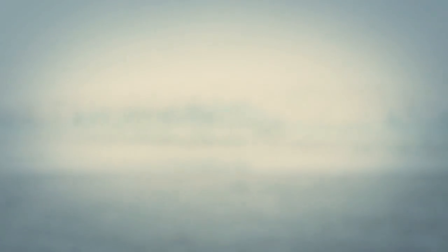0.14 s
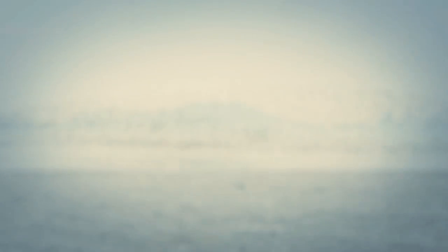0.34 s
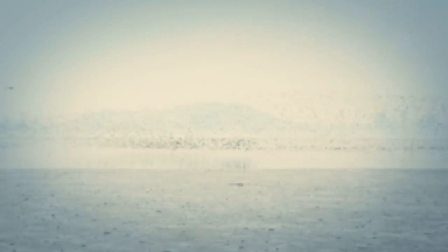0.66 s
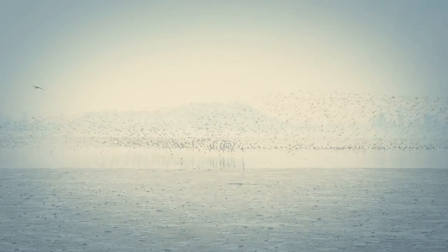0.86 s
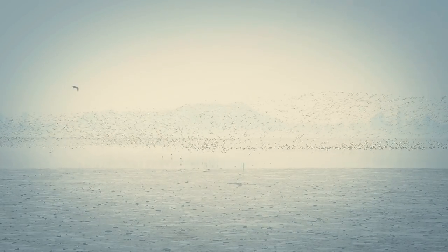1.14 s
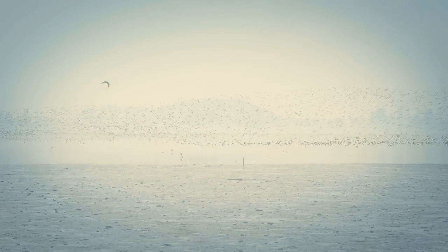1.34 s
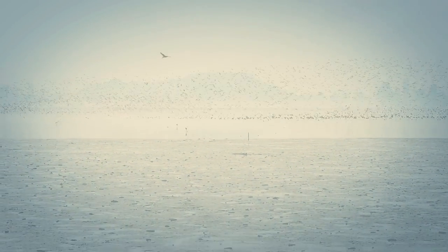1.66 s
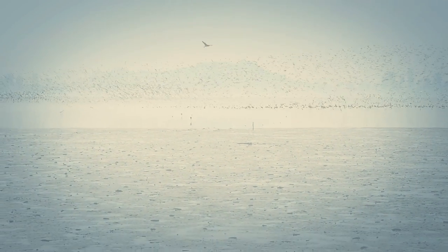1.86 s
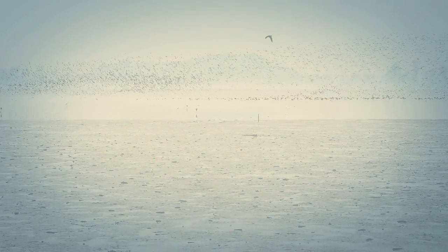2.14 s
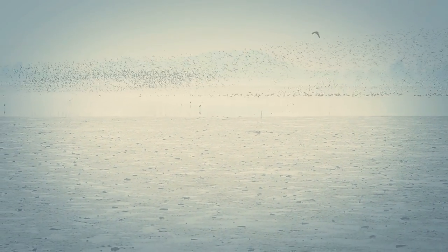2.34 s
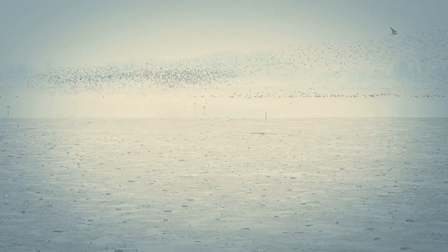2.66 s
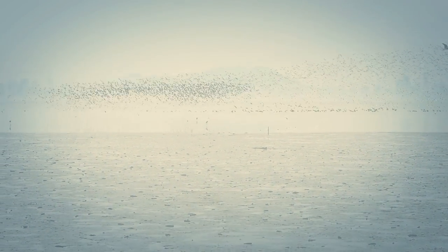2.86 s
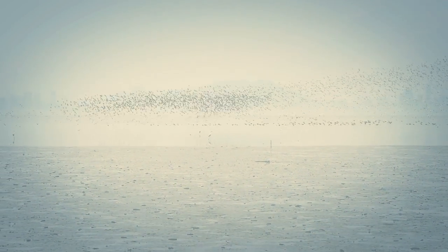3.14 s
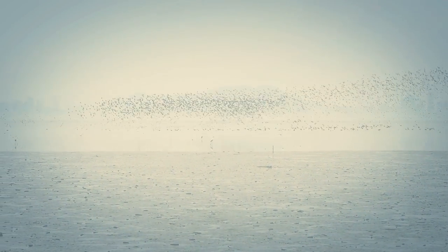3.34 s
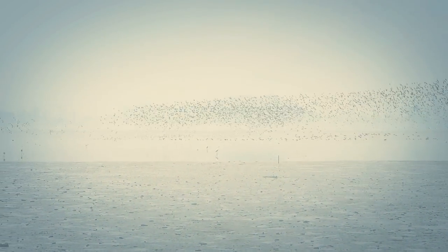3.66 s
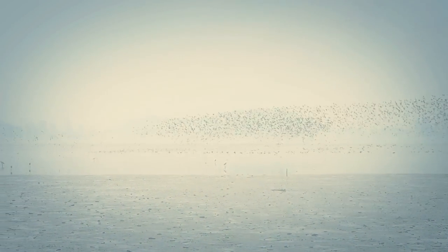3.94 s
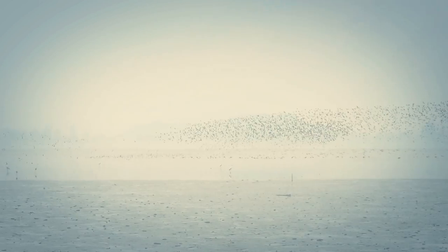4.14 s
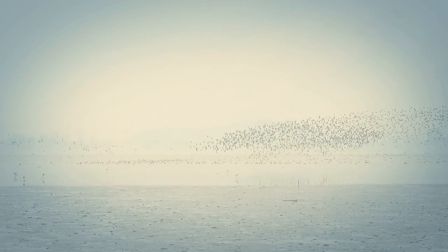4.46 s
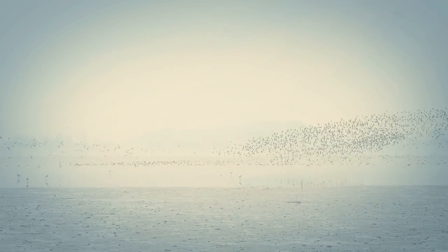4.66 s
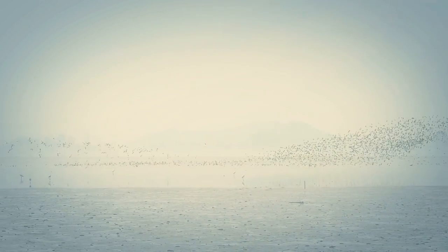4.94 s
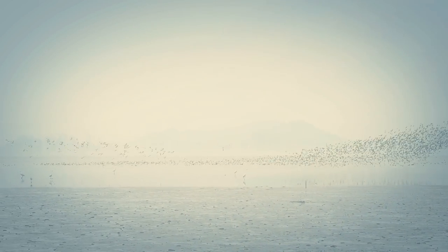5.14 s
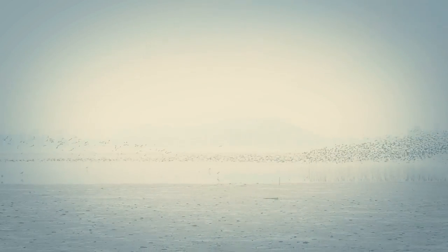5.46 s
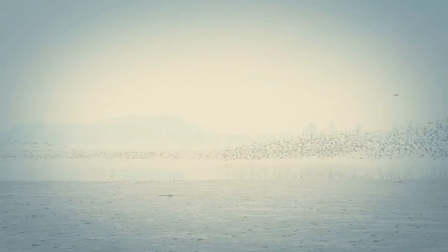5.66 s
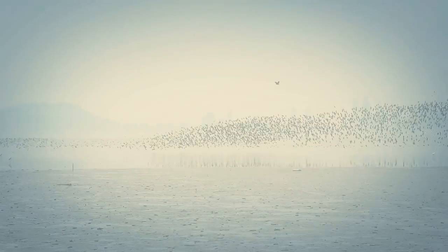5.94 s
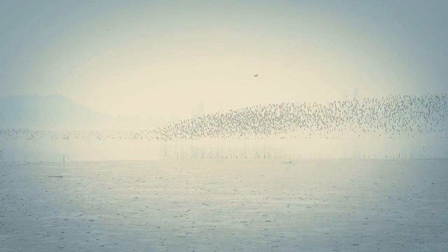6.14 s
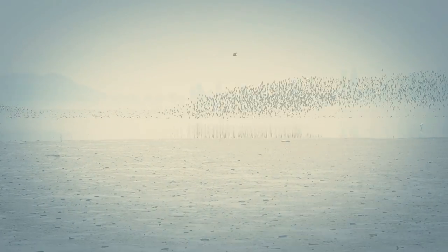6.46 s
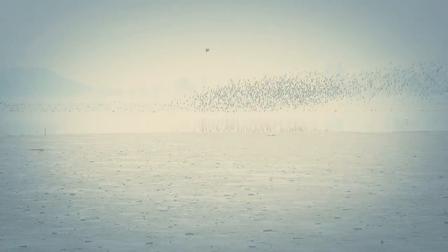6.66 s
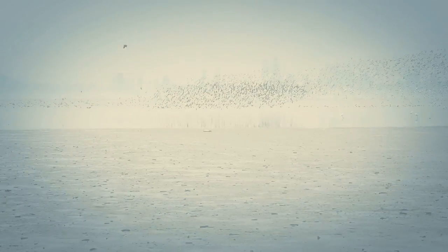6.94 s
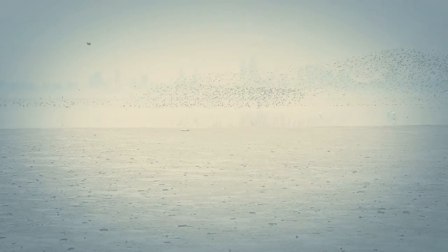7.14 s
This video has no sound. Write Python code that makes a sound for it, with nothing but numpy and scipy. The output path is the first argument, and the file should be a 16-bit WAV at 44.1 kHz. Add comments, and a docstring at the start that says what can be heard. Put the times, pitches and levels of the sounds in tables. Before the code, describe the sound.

A steady low wind rumble and the dense, high peeping of a distant shorebird flock run throughout, outdoors on tidal flats. For the first half second a lens motor buzzes close on the right; very faint focus ticking continues afterwards. Short whistles from larger waders stand out above the chatter, with sharper ones around 1.5 to 2.5 seconds. A far engine hums low from about 0.5 seconds and fades out by 4. The whistling thickens from about 3 seconds, and one bird repeats a clear arched whistle four times between 3.6 and 4.5 seconds. A mild gust passes near 5 seconds. A quick run of faint, nearer peeps follows from 6.2 to 6.9 seconds as the flock keeps calling. Small ticks, soft knocks and finger brushes on the camera come around 0.5 seconds, from 4.5 to 5, and from 6 to 7.

```python
"""Tidal flats, a stereo microphone far from a flock of shorebirds. From the start wind rumbles low,
small sandpipers peep in a dense chatter and larger waders whistle. Right at the microphone a lens motor
buzzes for half a second; the focus drive ticks throughout, and hands tick, knock and brush the camera.
A far engine drones until about 4 s while the whistling thickens. One gust passes near 5 s, and a run
of nearer peeps follows after 6 s."""
import sys
import numpy as np
from scipy import signal
from scipy.fft import rfft, irfft
from scipy.io import wavfile
from scipy.ndimage import map_coordinates

SR = 44100
rng = np.random.default_rng(int(sys.argv[2]) if len(sys.argv) > 2 else 0)


def waveform_to_disk(signal):
    """Save audio, clipped to [-1, 1], as 16-bit WAV at the path in sys.argv[1]."""
    frames = np.transpose(np.atleast_2d(signal))
    scaled = np.clip(frames, -1, 1) * 32767
    samples = np.round(scaled).astype(np.int16)
    wavfile.write(sys.argv[1], SR, samples)


N = 322150
CALLER_PAN_DB = -1.6   # the whistling waders sit a little to the right


def from_db(db):
    return 10 ** (np.asarray(db) / 20)


def in_time(rows):
    """One curve per column, joining rows that begin with a time in seconds."""
    times_s, *columns = np.transpose(rows)
    return [np.interp(np.arange(N) / SR, times_s, column) for column in columns]


def at_hz(points, hz):
    """Values between the points, on a logarithmic frequency axis."""
    points_hz, values = np.transpose(points)
    return np.interp(np.log(hz), np.log(points_hz), values)


def drift(rate_hz):
    """Smooth random wander with a spread of about 1."""
    knots = rng.standard_normal(800)
    return map_coordinates(knots, [np.arange(N) / SR * rate_hz], order=3, mode="wrap")


def pan(x, db):
    """Mono to stereo; db is left over right."""
    return x * from_db([[db / 2], [-db / 2]])


def ring(force, hz, t60_s):
    """One damped mode: a unit click sets a sine of height 1 ringing."""
    decay, step = from_db(-60 / (t60_s * SR)), 2 * np.pi * hz / SR
    return signal.lfilter([0, np.sin(step)], [1, -2 * decay * np.cos(step), decay * decay], force + 1e-18)


def coloured(spectrum):
    """Stereo noise of a given spectral shape; the mean of both sides has rms 1."""
    # how alike the two channels are: frequency_hz, correlation
    likeness = [(60, 0.99), (130, 0.85), (290, 0.32), (640, 0.18), (1410, 0.36), (3100, 0.62), (6820, -0.1),
                (15000, -0.17)]
    # their balance: frequency_hz, left_over_right_db
    sides = [(60, -3), (110, 0), (200, -3.5), (380, -4.5), (700, -9), (1290, -4.5), (2380, -2.5),
             (4400, 1.5), (8120, -4), (15000, -5.5)]
    hz = np.maximum(np.fft.rfftfreq(N, 1 / SR), 1)
    mid, side = rfft(rng.standard_normal((2, N))) * from_db(at_hz(spectrum, hz))
    alike = np.clip(at_hz(likeness, hz), 0, 1)
    sign = np.array([[1], [-1]])
    channels = np.sqrt(1 + alike) * mid + sign * np.sqrt(1 - alike) * side
    out = irfft(channels * from_db(sign * at_hz(sides, hz) / 2), N)
    return out / np.sqrt(np.mean(out.mean(axis=0) ** 2))


def wind():
    """Open air at the microphone: four wavering noise bands; one gust lifts the wash and the hiss."""
    # spectral shapes of the four bands: frequency_hz, relative_density_db
    rumble = [(8.8, -36), (15, -9), (22, -21), (52, -4), (86, 0), (103, -0.5), (124, -6), (145, -7),
              (258, -23.5), (400, -28), (520, -55), (880, -120)]
    wash = [(150, 1), (260, 2), (420, -17), (520, 4.5), (800, 4), (1100, -0.5), (1300, -10), (1550, 3.5),
            (2300, 2), (3500, -0.5), (4600, -26), (6000, -39)]
    hollow = [(200, -16), (300, -7.5), (400, -0.5), (460, -3.5), (520, -31), (700, -39)]
    hiss = [(2650, -6.5), (4500, -3), (5120, -6), (5990, -11.5), (8570, -13), (9920, -4.5), (11600, -13),
            (15600, -15)]
    # course of the hollow band near 400 Hz: time_s, level_db
    hollow_level = [(0, -54), (1, -58.5), (1.6, -60.5), (4.7, -62), (5.3, -53.5), (5.8, -54.5),
                    (7.3, -56.5)]
    gust_s, gust_length_s, gust_peak_db = 4.85, .4, 3.5
    gust_db = gust_peak_db * np.exp(-(2 * (np.arange(N) / SR - gust_s) / gust_length_s) ** 2)
    air = from_db(-39.5 + 1.1 * drift(5)) * coloured(rumble)
    air += from_db(-51.5 + gust_db + 1.33 * drift(10.5)) * coloured(wash)
    air += from_db(in_time(hollow_level)[0] + .74 * drift(12)) * coloured(hollow)
    air += from_db(-59.5 + gust_db + .9 * drift(7.1)) * coloured(hiss)
    return air


def far_engine():
    """A far engine: one low, wavering tone that fades with distance."""
    # course of the drone: time_s, pitch_hz, level_db
    drone = [(0.6, 136.8, -52), (0.76, 135.9, -50), (1.95, 139.6, -45.5), (3.26, 136.8, -49.5),
             (3.36, 132.6, -55), (3.6, 146.6, -61)]
    hz, level_db = in_time(drone)
    fade = np.interp(np.arange(N) / SR, [.4, .7, 3.4, 3.9], [0, 1, 1, 0])
    waver = from_db(2.5 * drift(6))
    tone = np.sqrt(2) * np.sin(2 * np.pi * np.cumsum(hz) / SR)
    return pan(fade * waver * from_db(level_db) * tone, -1.3)


def lens_motor():
    """The motor's buzz travels through the housing, mostly to the right microphone port."""
    # lines of the buzz: frequency_hz, level_db
    lines = [(236.9, -44.5), (479.1, -62), (1195, -57), (1432, -62), (2148, -95), (2385, -64.5),
             (2789, -64)]
    # runs of the motor: start_s, stop_s, gain_db
    runs = [(0, 0.548, -3), (1.082, 1.103, -6.5), (4.359, 4.376, -7.5)]
    loading_db_per_s, edge_s = 17, .0044   # each run grows louder towards its end
    t = np.arange(N) / SR
    buzz, running = np.zeros((2, N))
    for hz, db in lines:
        buzz += from_db(db + 1.45 * drift(10.87)) * np.sin(2 * np.pi * hz * t + rng.uniform(0, 2 * np.pi))
    for start_s, stop_s, gain_db in runs:
        gate = np.clip(np.minimum(t - start_s, stop_s - t) / edge_s + 1, 0, 1)
        running += gate * from_db(gain_db + loading_db_per_s * np.clip(t - stop_s, -1, 0))
    return pan(np.sqrt(2) * buzz * running, -23.5)


def focus_ticks():
    """The focus drive steps 25 times a second: faint, uneven knocks in the housing."""
    steps = ((.018 + np.arange(182) / 25) * SR).astype(int)
    clicks = np.zeros(N)
    clicks[steps] = from_db(-58.5 + 4.4 * np.minimum(rng.standard_normal(len(steps)), 1.5))
    return pan(ring(clicks, hz=1115, t60_s=.034) + ring(clicks, hz=790, t60_s=.018), -16.5)


def camera_ticks():
    """Each slip of the camera in the hands sends a 2.5 ms crackle into the shell's bright modes."""
    # slips: start_s, strength_db, left_over_right_db
    slips = [(0.4416, -44, -10), (0.455, -42, -9), (0.505, -43, -25), (0.513, -35.5, -8),
             (0.6858, -46, -7.5), (0.8026, -47, -6.5), (1.057, -43, -11), (4.7855, -47, -6),
             (4.7914, -47, -4.5), (4.815, -40, -21), (4.841, -49, -21), (4.8518, -46, -19),
             (5.314, -49.5, -18), (6.0725, -46, 1), (6.2454, -51, -4.5), (6.58, -44.5, 7), (6.663, -48, -1),
             (6.7074, -59, -9)]
    # bright modes of the shell: frequency_hz, t60_s
    modes = [(5800, .0015), (8500, .002), (10500, .002), (13500, .0015)]
    force = np.zeros((2, N))
    for start_s, strength_db, pan_db in slips:
        at = int(start_s * SR)
        crackle = from_db(strength_db - 14) * rng.standard_normal(110) * np.hanning(110)
        force[:, at:at + 110] += pan(crackle, pan_db)
    return sum(ring(force, hz, t60_s) for hz, t60_s in modes)


def camera_knocks():
    """Soft pushes of 0.4 ms ring the camera body's dull modes, near the right microphone port."""
    # knocks, with their strength in the upper and lower modes: start_s, ring_db, thud_db
    knocks = [(0.4575, -35, -33.5), (0.5061, -29, -52), (2.458, -48, -44), (4.547, -35, -30),
              (4.573, -40, -54), (4.818, -34, -45), (4.842, -29.5, -33), (5.818, -36, -42),
              (6.074, -38, -48), (6.456, -54, -37.5), (6.710, -34, -50)]
    # dull modes of the body: frequency_hz, t60_s
    modes = [(180, 0.029), (420, 0.01), (900, 0.0085), (1500, 0.0068), (2100, 0.018)]
    out = np.zeros(N)
    for hz, t60_s in modes:
        force = np.zeros(N)
        for start_s, ring_db, thud_db in knocks:
            at = int(start_s * SR)
            strength_db = ring_db if hz > 700 else thud_db
            force[at:at + 16] -= from_db(strength_db - 17) * np.hanning(16)
        out += ring(force, hz, t60_s)
    return pan(out, -16)


def finger_brushes():
    """Fingers brush the camera body: short swells of bright, grainy noise."""
    # strokes: centre_s, length_s, level_db
    strokes = [(0.4, 0.19, -64), (.7, .06, -68), (4.818, 0.11, -62), (5.07, 0.079, -63), (6.88, 0.071, -62),
               (7.04, 0.18, -64)]
    # spectral shape of the rubbing: frequency_hz, relative_density_db
    spectrum = [(2650, -54), (4500, -30), (5260, 8.5), (5900, 4), (7180, -2), (9610, 5), (15600, -45)]
    t = np.arange(N) / SR
    swell = sum(from_db(db) * np.exp(-(2 * (t - centre_s) / length_s) ** 2)
                for centre_s, length_s, db in strokes)
    grain = from_db(1.5 * drift(100))
    return swell * grain * coloured(spectrum)


def add_call(out, start_s, length_s, contour_hz, level_db, pan_db, lead_s, scoop, hoarse_db, overtone_db):
    """One bird call: a sine with faint overtones through four pitches, made hoarse by unsteady breath."""
    t = np.arange(int((length_s + lead_s) * SR)) / SR - lead_s
    cubic = np.polyfit([0, 1 / 3, 2 / 3, 1], contour_hz, 3)
    hz = np.polyval(cubic, np.clip(t / length_s, 0, 1))
    hz *= 1 - scoop * np.clip(-t / lead_s, 0, 1) ** 1.5   # the voice scoops up into the note
    phase = 2 * np.pi * np.cumsum(hz) / SR + rng.uniform(0, 2 * np.pi)
    swell = np.sin(np.pi * (t + lead_s) / (length_s + lead_s)) ** .4
    puffs = rng.standard_normal(90)
    breath = from_db(hoarse_db * np.interp(t + lead_s, np.arange(90) * .006, puffs))
    voice = np.sin(phase) + from_db(overtone_db) * (np.sin(2 * phase) + np.sin(3 * phase))
    call = np.sqrt(2) * from_db(level_db) * swell * breath * voice
    at = max(int((start_s - lead_s) * SR), 0)
    out[:, at:at + len(t)] += pan(call, pan_db)[:, :max(N - at, 0)]


def crowd(count, centre_hz, spread, length_s, arch, spread_db):
    """Many hoarse calls at random moments, most rising and falling again; rms 1."""
    out = np.zeros((2, N))
    calls = np.c_[rng.random(count), rng.standard_normal((count, 5))]
    for when, pitch, opening, ending, stretch, strength in calls:
        bend = arch * np.array([-1 + .5 * opening, 0, .2, -.5 + .6 * ending])
        contour_hz = centre_hz * np.exp(spread * pitch + bend)
        add_call(out, when * N / SR, length_s * np.exp(.4 * stretch), contour_hz, spread_db * strength,
                 pan_db=-1.5 + 3 * opening, lead_s=.006, scoop=.05, hoarse_db=4, overtone_db=-40)
    return out / np.sqrt(np.mean(out ** 2) + 1e-20)


def far_flock():
    """Far out on the flats, waders' whistles and sandpipers' peeps merge into a chatter."""
    # swell and ebb of the flock: time_s, waders_db, sandpipers_db
    levels = [(0, -74, -47.5), (.6, -82, -53.5), (.85, -70, -49.5), (1.14, -71, -51.5), (1.4, -74, -47),
              (2.1, -57, -48), (2.9, -55, -49.5), (3.38, -46, -48.5), (3.65, -51, -55),
              (4.15, -49.5, -55.5), (4.35, -50, -50.5), (4.5, -46.5, -56), (4.62, -49, -53),
              (4.84, -44, -48), (5.18, -52, -76), (5.55, -51, -60), (5.8, -50.5, -55), (6.3, -50.5, -55.5),
              (7, -51, -50.5), (7.3, -54, -55)]
    waders_db, sandpipers_db = in_time(levels)
    waders = crowd(count=1500, centre_hz=2160, spread=.11, length_s=.04, arch=.03, spread_db=3)
    sandpipers = crowd(count=4500, centre_hz=3620, spread=.1, length_s=.017, arch=.09, spread_db=2.5)
    return from_db(waders_db) * waders + from_db(sandpipers_db) * sandpipers


def near_peeps():
    """Sandpipers nearer the microphone: each peep rises steeply and falls further, in 30 ms."""
    # peeps: start_s, top_hz, level_db
    peeps = [(6.196, 4400, -59), (6.25, 4500, -60), (6.318, 4250, -57), (6.386, 4350, -58),
             (6.465, 4000, -58), (6.56, 4400, -57), (6.59, 4300, -60), (6.637, 4250, -58),
             (6.676, 4450, -56), (6.725, 4250, -59), (6.79, 4250, -60), (6.832, 4300, -60)]
    out = np.zeros((2, N))
    for start_s, top_hz, level_db in peeps:
        contour_hz = top_hz * np.array([.88, 1, .95, .76])
        add_call(out, start_s, .03, contour_hz, level_db, pan_db=-1,
                 lead_s=.005, scoop=.04, hoarse_db=3, overtone_db=-40)
    return out


def arched_whistles():
    """One bird repeats a clear whistle: up to an early top, then a longer fall."""
    # its calls: start_s, length_s, top_hz, level_db
    calls = [(1.325, .11, 2600, -52), (2.519, .09, 2390, -48), (3.648, .085, 2590, -48),
             (3.92, .085, 2570, -47), (4.185, .087, 2570, -45.5), (4.452, .096, 2540, -46.5),
             (5.85, .065, 2690, -48.5), (6.266, .05, 2710, -51), (7.195, .05, 2530, -49)]
    # pitch at the start, the thirds and the end of a call: share_of_top
    shape = [.935, .998, .978, .905]
    out = np.zeros((2, N))
    for start_s, length_s, top_hz, level_db in calls:
        add_call(out, start_s, length_s, top_hz * np.array(shape), level_db, CALLER_PAN_DB,
                 lead_s=.008, scoop=.05, hoarse_db=1.5, overtone_db=-36)
    return out


def carrying_calls():
    """Calls that carry above the flock, mostly waders' whistles with some higher sandpiper peeps among them: a
    slide plus an arch; short, forceful ones scoop up deeply."""
    # single calls: start_s, length_s, pitch_hz, slide_hz, level_db
    calls = [(.085, .03, 2390, 20, -52), (.25, .03, 1690, -20, -55), (.43, .024, 4280, -100, -53),
             (.672, .03, 3760, 0, -53), (.766, .055, 2150, 230, -45), (.875, .015, 4870, -100, -57),
             (1.02, .066, 1840, 80, -54), (1.155, .04, 2440, 50, -55), (1.248, .049, 1890, 230, -54),
             (1.33, .07, 1060, 0, -57), (1.46, .03, 2310, 150, -53), (1.564, .049, 2200, 80, -41),
             (1.643, .081, 2150, 190, -54), (1.724, .066, 1900, -40, -47.5), (1.835, .03, 1750, 170, -52),
             (1.85, .03, 2000, 20, -53), (1.878, .049, 1690, 60, -51), (1.913, .102, 2250, 250, -49),
             (1.98, .041, 1850, 30, -53), (2.035, .049, 2270, 180, -40), (2.139, .049, 1900, 30, -50),
             (2.2, .032, 1820, 210, -53), (2.226, .075, 2280, 0, -47), (2.241, .125, 1840, -30, -54),
             (2.32, .06, 1570, 40, -51), (2.403, .148, 1750, 320, -52), (2.467, .049, 2190, 160, -43),
             (2.479, .041, 1970, 50, -50), (2.09, .1, 4470, 0, -59), (2.58, .041, 1730, 120, -52),
             (2.644, .035, 2420, 10, -52), (2.798, .064, 1770, -60, -52), (2.827, .081, 2330, -30, -46),
             (2.839, .084, 1870, 60, -52), (2.949, .122, 1710, 110, -51), (2.99, .046, 2030, -20, -50),
             (3.071, .27, 1910, 160, -48), (3.236, .032, 2560, 40, -47), (3.257, .041, 2240, 100, -47),
             (3.265, .038, 2650, -40, -50), (3.347, .125, 2000, 170, -49), (3.33, .13, 2300, -40, -47),
             (3.37, .046, 2540, 80, -51), (3.55, .038, 2120, 80, -48), (3.475, .135, 2370, -30, -43),
             (3.73, .05, 2120, -200, -48), (3.785, .075, 2090, 60, -45), (3.755, .02, 4570, -500, -58),
             (3.882, .014, 4670, 1400, -55), (4.008, .084, 2050, 140, -49), (4.04, .087, 2150, -230, -47),
             (4.078, .041, 2520, 60, -48), (4.116, .035, 1920, 70, -51), (4.27, .07, 3520, -250, -52),
             (4.394, .049, 2520, 100, -49), (4.409, .035, 2020, -20, -47), (4.429, .038, 1810, -30, -50),
             (4.452, .073, 2090, 70, -47), (4.72, .045, 1880, 60, -46), (4.77, .035, 2010, 80, -45),
             (4.68, .025, 2300, 0, -48), (4.745, .03, 2480, 30, -46), (4.79, .12, 2420, 60, -48),
             (4.478, .035, 2200, 60, -45), (4.48, .03, 1850, 0, -47), (4.807, .046, 2310, 100, -48),
             (4.818, .055, 1710, 150, -48), (4.853, .044, 2100, 20, -45), (4.873, .041, 2240, 20, -48),
             (5.039, .041, 1870, 70, -50), (5.056, .064, 2520, 110, -50), (5.088, .055, 2210, 10, -46),
             (5.195, .035, 2320, 90, -49), (5.268, .046, 1920, -50, -51), (5.367, .046, 2040, 30, -51),
             (5.564, .067, 1870, -50, -50), (5.587, .107, 2240, 170, -50), (5.666, .058, 1880, 50, -52),
             (5.788, .078, 2270, 0, -48), (5.31, .03, 3790, 100, -56), (5.962, .055, 1910, -70, -47),
             (5.968, .073, 2360, 260, -51), (6.002, .044, 2160, 30, -50), (6.235, .046, 2190, 170, -51),
             (6.255, .044, 1920, 0, -49), (6.316, .081, 1810, 40, -51), (6.336, .046, 2470, 40, -50),
             (6.519, .064, 2150, 110, -50), (6.606, .044, 2380, 30, -51), (6.623, .136, 1780, -370, -49),
             (6.641, .061, 2070, 50, -48), (6.716, .046, 2240, 220, -49), (6.789, .064, 2480, 130, -48),
             (6.806, .035, 2180, 10, -50), (6.841, .046, 2710, -90, -51), (7.033, .067, 1970, 40, -51),
             (7.13, .06, 1030, 30, -59), (2.962, .028, 6800, 0, -68), (3.018, .028, 7100, -300, -69),
             (3.075, .025, 6450, 0, -70), (6.86, .045, 5900, -400, -66), (6.99, .08, 5850, 250, -64),
             (1.21, .06, 2030, 110, -58)]
    arch_hz_per_s, arch_max_hz = 900, 90   # a longer call arches higher
    out = np.zeros((2, N))
    progress = np.arange(4) / 3
    pans_db = CALLER_PAN_DB + 3.5 * rng.standard_normal(len(calls))
    for (start_s, length_s, pitch_hz, slide_hz, level_db), pan_db in zip(calls, pans_db):
        arch_hz = min(arch_hz_per_s * length_s, arch_max_hz) * 4 * progress * (1 - progress)
        contour_hz = pitch_hz + slide_hz * (progress - .5) + arch_hz
        scoop = .22 if length_s < .065 and level_db > -46 else .09
        add_call(out, start_s, length_s, contour_hz, level_db, pan_db,
                 lead_s=.018, scoop=scoop, hoarse_db=2.8, overtone_db=-34)
    return out


def across_flats(calls, wet_db):
    """Mud and water scatter echoes; the birds lie to the right, so the left channel hears them later."""
    t60_s, left_lag_s = .15, .00005
    tail = rng.standard_normal((2, 6000)) * from_db(-60 * np.arange(6000) / SR / t60_s)
    tail /= np.linalg.norm(tail[0])
    echoes = signal.fftconvolve(calls.mean(axis=0)[None], tail, axes=1)[:, :N]
    left, right = calls + from_db(wet_db) * echoes
    samples = np.arange(N)
    return np.array([np.interp(samples - left_lag_s * SR, samples, left), right])


def scene():
    """Birds across the flats, the farthest with most echo; wind, engine and the camera close by."""
    flock = far_flock()
    callers = carrying_calls() + arched_whistles() + near_peeps()
    birds = across_flats(callers, wet_db=-11) + across_flats(flock, wet_db=-2)
    air = wind()
    camera = lens_motor() + focus_ticks() + camera_ticks() + camera_knocks() + finger_brushes()
    return air + far_engine() + camera + birds


def record(dry):
    """The recorder cuts the top treble steeply; its converter sits slightly off zero."""
    stopband_hz, offset = 15891.75, -.0024
    lowpass = signal.cheby2(20, 60, stopband_hz, fs=SR, output="sos")
    return signal.sosfilt(lowpass, dry) + offset


dry = scene()
out = record(dry)
waveform_to_disk(out)
```